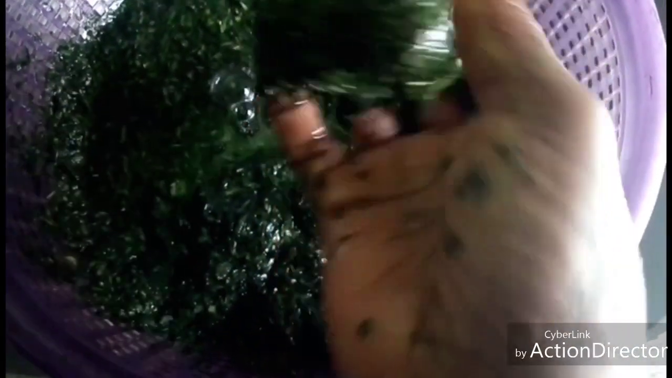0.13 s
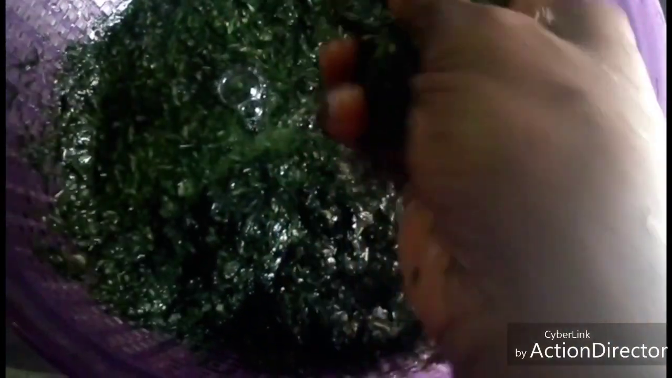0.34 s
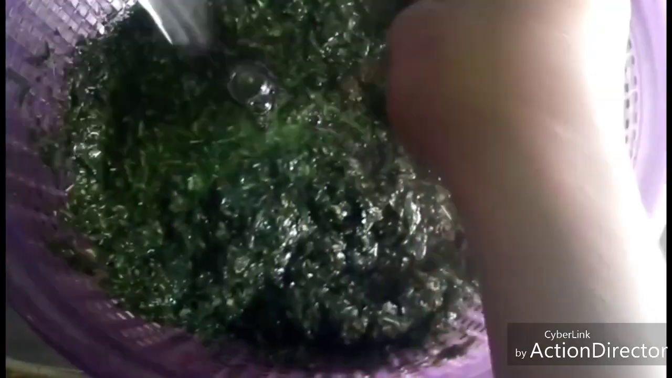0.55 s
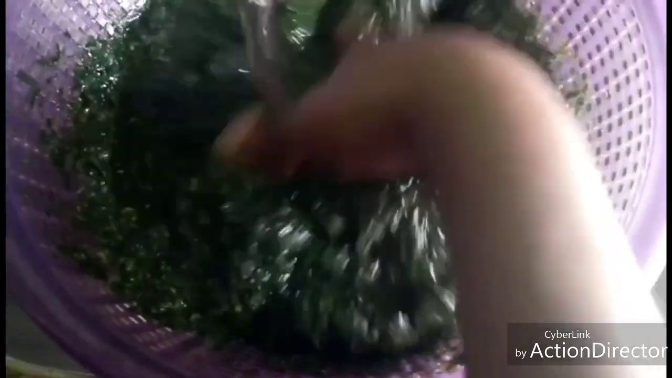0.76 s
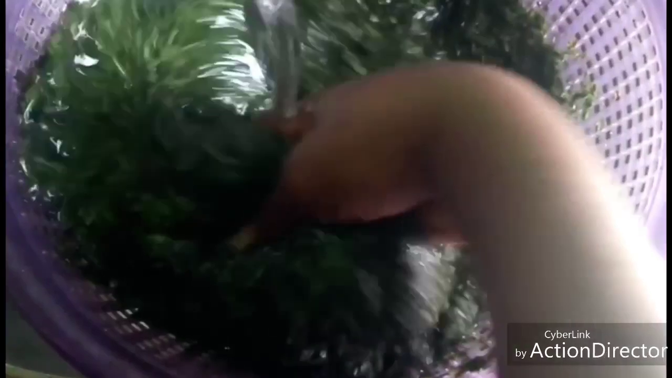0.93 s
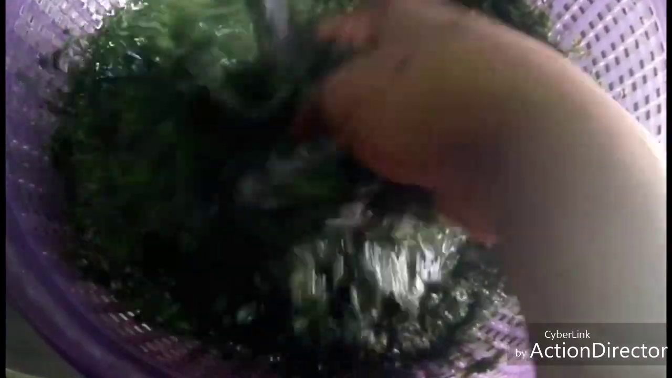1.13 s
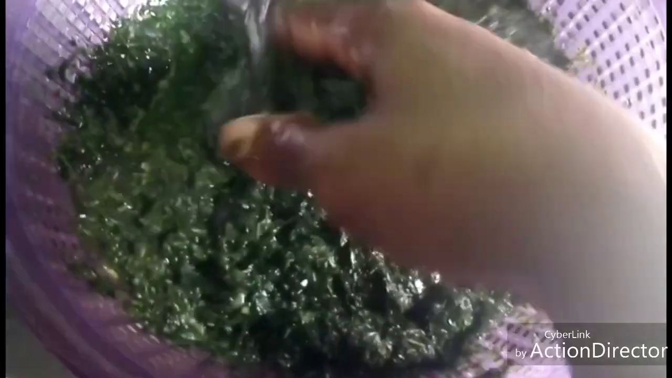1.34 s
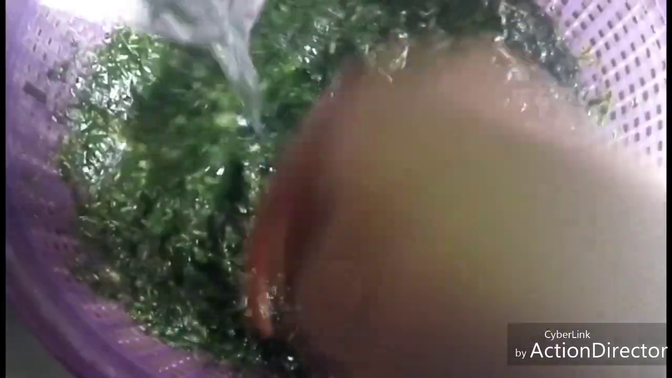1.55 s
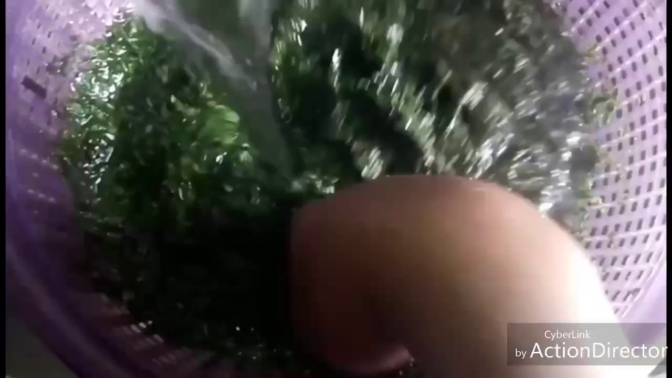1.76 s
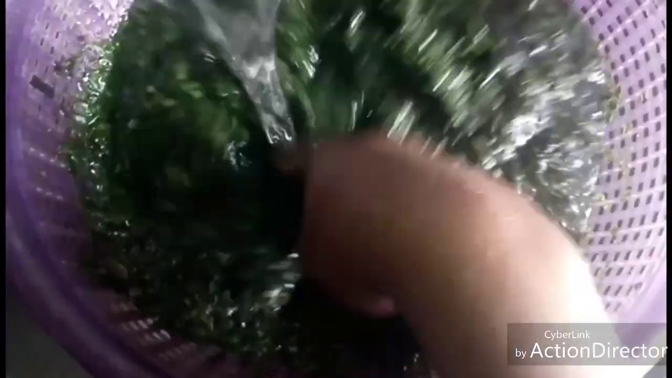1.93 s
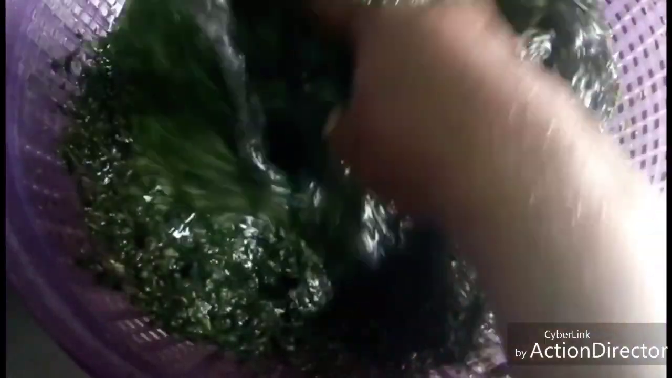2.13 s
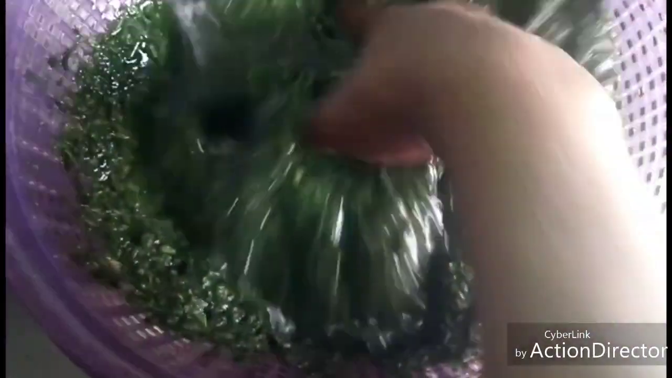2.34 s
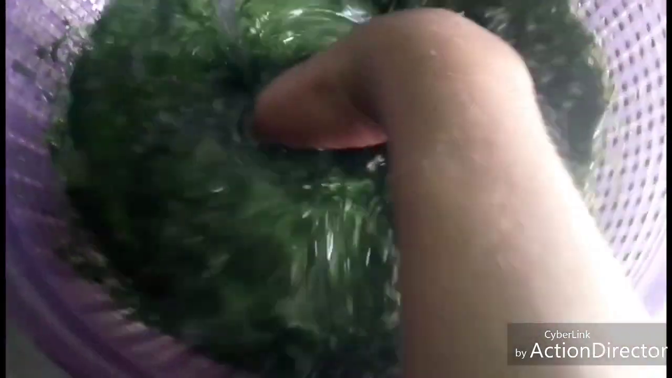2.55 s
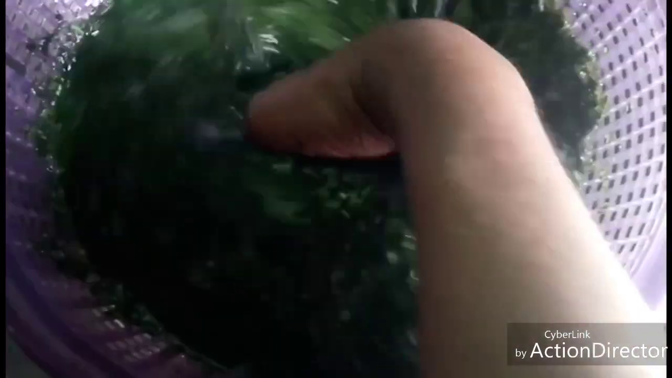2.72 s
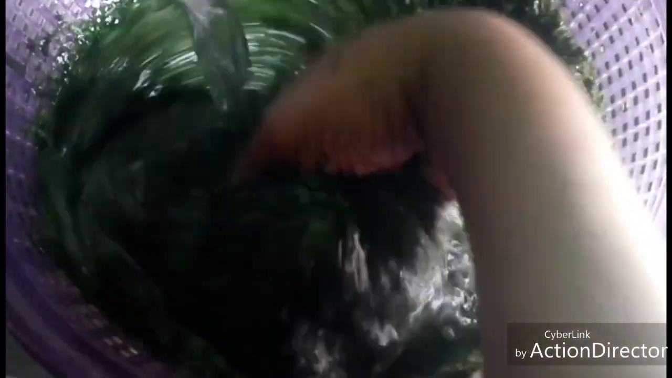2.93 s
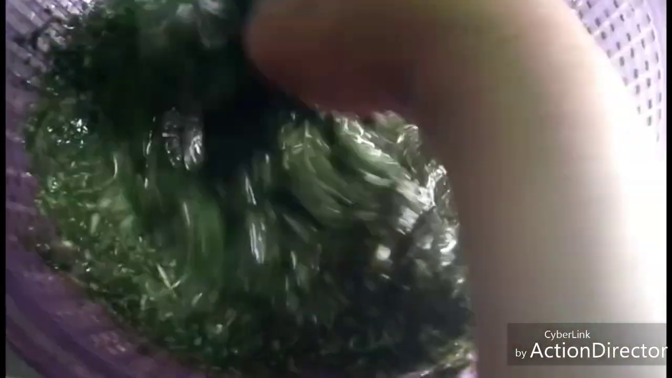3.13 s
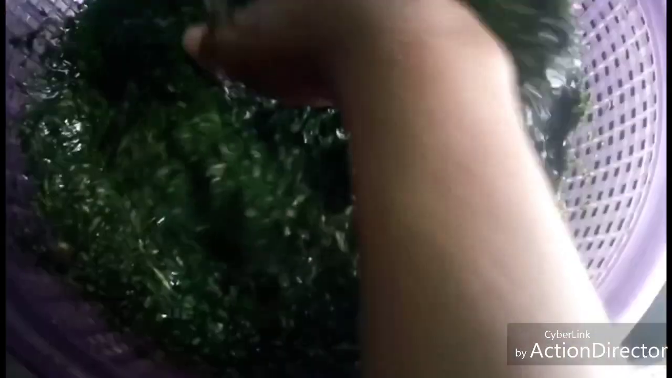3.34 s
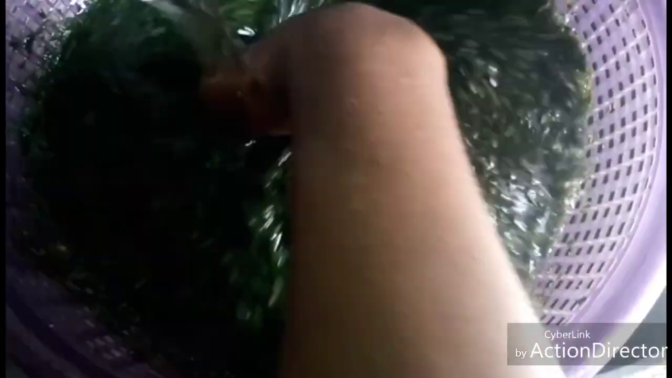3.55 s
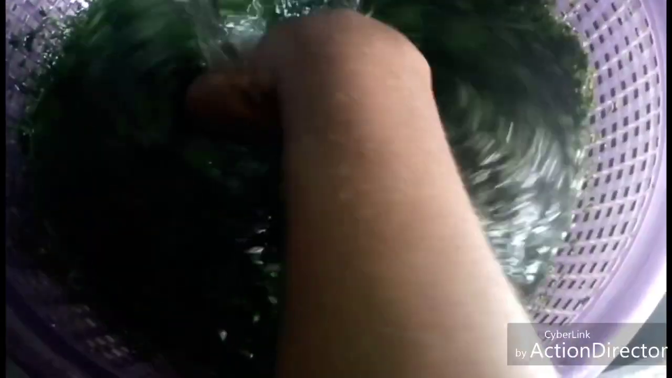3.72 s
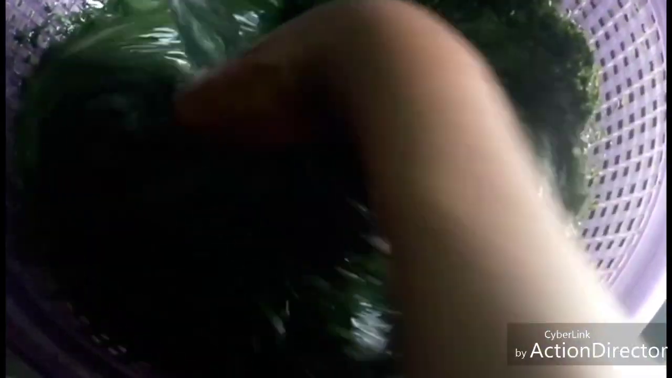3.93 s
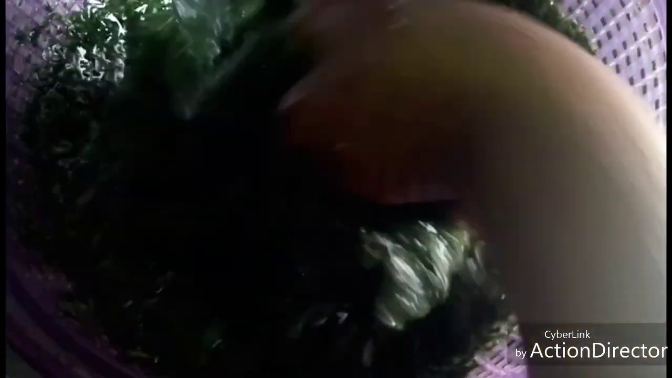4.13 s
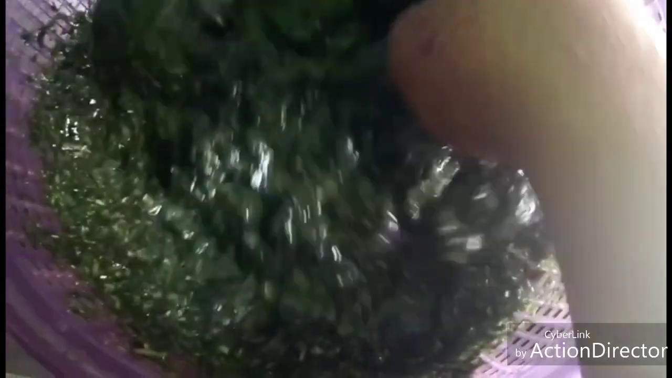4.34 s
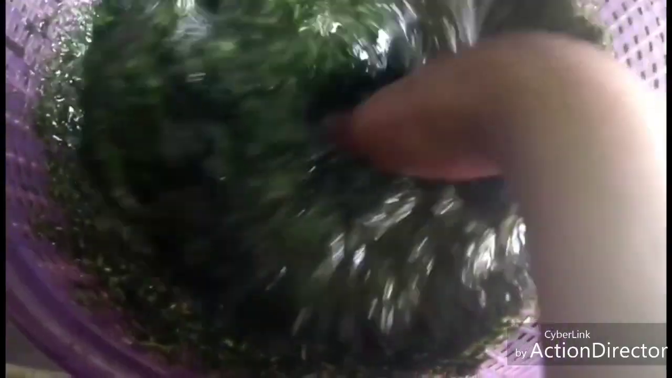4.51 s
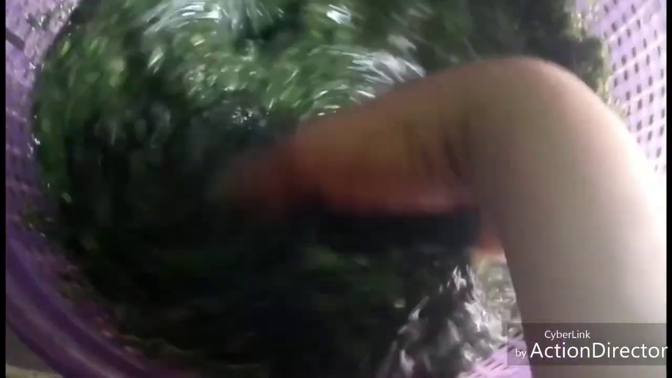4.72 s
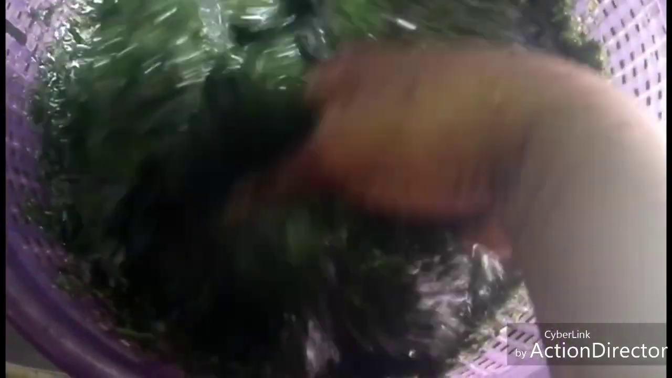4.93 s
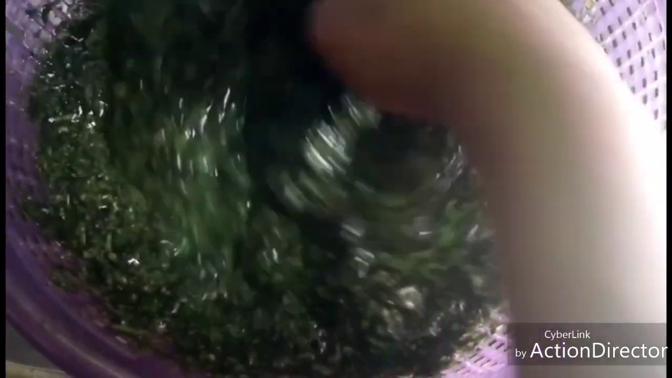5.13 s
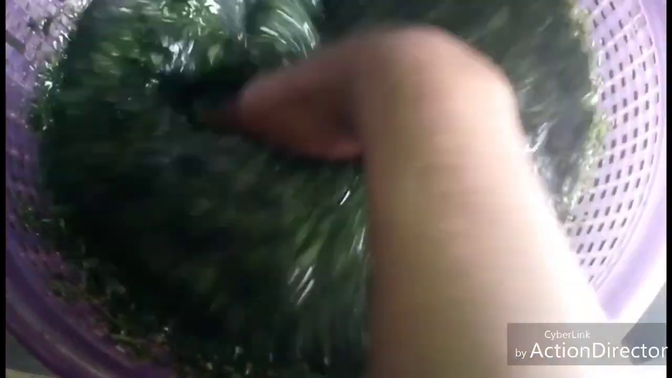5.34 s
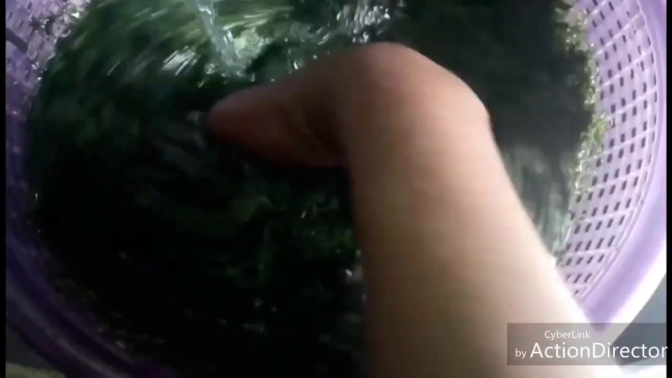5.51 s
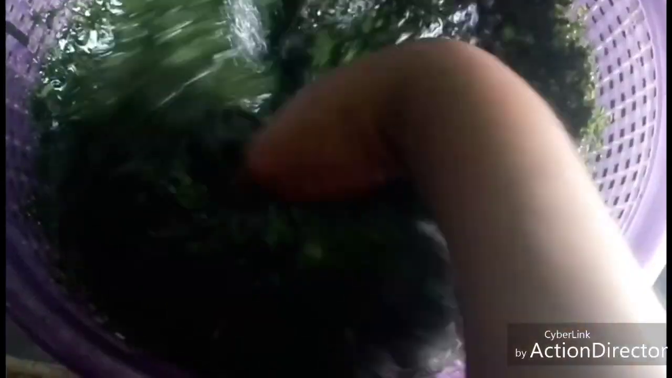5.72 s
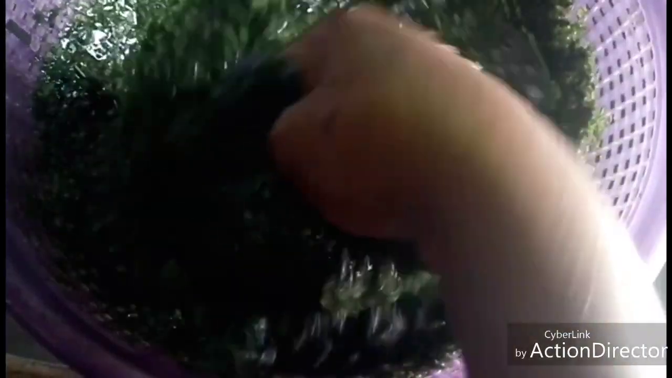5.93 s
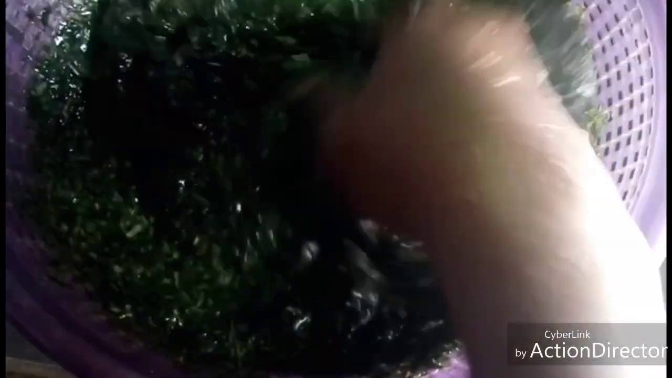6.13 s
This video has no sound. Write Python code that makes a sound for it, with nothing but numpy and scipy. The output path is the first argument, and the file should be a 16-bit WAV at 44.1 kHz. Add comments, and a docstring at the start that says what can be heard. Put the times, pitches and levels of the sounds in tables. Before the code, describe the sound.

In a small kitchen, very close to a plastic colander, low room rumble, steady faint draining hiss and a wavering low machine hum come first, with soft grainy water. At about 0.14 s a faint air pocket gulps; from 0.4 s a gentle stroke swells. Near 0.8 s the first strong stroke brings bright fizz, droplet clicks and small rising bubble pops. From 1 to 2 s strokes follow irregularly, about four or five a second, with a dull basket bump near 1.7 s. From 2 to 4.5 s it gets fuller and louder, with denser crackle, spray, slosh and gulps, strongest around 3.35 and 3.7 s; soft bumps fall near 2.5 and 3.45 s. After another bump at 4.8 s, strokes ease somewhat around 5.4 s, yet fizz, drips and bubbles continue until the end near 6.2 s. Sink reflections are short and tight.

```python
"""In a kitchen, a phone microphone close to a plastic colander: rumble, draining hiss and machine hum come first,
made of filtered noise and a wavering sine, with water poured over wet shredded leaves as grainy noise.
An air pocket gulps at once as a damped sine, then a hand stirs and squeezes: each stroke swells fizz, spray and slosh.
Before one second droplets snap as clicks with puffs of noise and small bubbles burst as rising rings.
From the second second the basket bumps now and then, as low damped sines."""
import sys
import numpy as np
from scipy import signal
from scipy.fft import rfft, irfft, next_fast_len
from scipy.io import wavfile
from scipy.ndimage import uniform_filter1d, map_coordinates

SR = 44100
rng = np.random.default_rng(int(sys.argv[2]) if len(sys.argv) > 2 else 0)


def unload_wav(signal):
    """Save mono or channel-first audio to the path in sys.argv[1] as 16-bit WAV at rate SR, clipped to [-1, 1]."""
    wavfile.write(
        sys.argv[1],
        SR,
        np.round(np.clip(np.atleast_2d(signal).T, -1, 1) * 32767).astype(np.int16),
    )


N = 272097  # length in samples
TOP_HZ = 16600  # highest bubble pitch, and the band limit of the phone


def amp(db):
    """Amplitude of a level in dB."""
    return 10 ** (np.asarray(db) / 20)


def unit(x):
    """x scaled to rms 1."""
    return x / np.sqrt(np.mean(x ** 2) + 1e-20)


def curves(rows):
    """One value per sample for each column after the time."""
    s, *columns = np.transpose(rows)
    return [np.interp(np.arange(N) / SR, s, column) for column in columns]


def wobble(rate):
    """A smooth random curve, rate knots a second."""
    knots = rng.standard_normal(int(N * rate / SR) + 4)
    return map_coordinates(knots, [np.arange(N) * rate / SR])


def gain(points, hz):
    """Gain of (Hz, dB) points read on a log frequency axis."""
    f, db = np.transpose(points)
    return amp(np.interp(np.log(hz + 1), np.log(f + 1), db))


def coloured(x, points):
    """x through the causal (minimum-phase) filter that has this spectrum."""
    m = 2 * next_fast_len(N // 2 + SR // 4)
    cepstrum = irfft(np.log(gain(points, np.fft.rfftfreq(m, 1 / SR)) + 1e-6), m)
    # folding the cepstrum onto positive time makes the filter causal
    cepstrum[1:m // 2] *= 2
    cepstrum[m // 2 + 1:] = 0
    return irfft(rfft(x, m) * np.exp(rfft(cepstrum)), m)[:N]


def rush(points, patchy_db, size=256):
    """Noise of rms 1 with patches of random gain; a larger size makes them narrower and longer."""
    z = signal.stft(rng.standard_normal(N + 2 * size), nperseg=size)[2]
    field = uniform_filter1d(rng.standard_normal(z.shape), size=5, axis=0)
    field = uniform_filter1d(field, size=5, axis=1)
    patchy = signal.istft(z * amp(patchy_db * unit(field)), nperseg=size)[1][:N]
    return unit(coloured(patchy, points))


def rings(s, level, hz, t60, rise, attack, size):
    """Damped sines; pitch climbs by twice the share rise within t60, as bubbles near the surface do."""
    s, level, hz, t60 = (np.asarray(v)[:, None] for v in (s, level, hz, t60))
    t = np.arange(size) / SR
    t60 = np.maximum(t60, 1e-3)
    envelope = level * amp(-60 * t / t60) * (1 - np.exp(-t / attack))
    wave = envelope * np.sin(2 * np.pi * hz * t * (1 + rise * t / t60))
    at = np.round(s * SR).astype(int) + np.arange(size)
    return np.bincount(at.ravel(), wave.ravel(), N + SR)[:N]


def grain_sizes(chance, spread_db):
    """Sizes of random grains: with a positive spread a few stand well out, with a negative one a few are weaker."""
    return amp(-spread_db * np.log(chance + .04))


def mix(noise, grains, share):
    """Two parts, the second weighted to this share of the power."""
    share = np.clip(share, 0, 1)
    return np.sqrt(1 - share) * noise + np.sqrt(share) * grains


# Rumble of the room around the microphone. Each row: frequency in Hz, relative level in dB.
RUMBLE = [(25, -42), (50, -15), (86, -5.5), (300, -11), (484, -20.5), (605, -20.5), (790, -20.5),
          (1020, -52), (1500, -32), (1950, -45), (3300, -120)]
# Standing waves of the room. Each row: frequency in Hz, level in dB before its random waver.
STANDING = [(129, -53.5), (157, -57), (198, -58), (466, -63), (820, -64)]


def kitchen_rumble():
    """Low noise of slowly shifting level, and room modes as sines with wavering strength and phase."""
    t = np.arange(N) / SR
    standing = np.zeros(N)
    for hz, db in STANDING:
        turn = 2 * np.pi * hz * t
        standing += amp(db) * (wobble(20) * np.sin(turn) + wobble(20) * np.cos(turn))
    level = amp(-45 + 0.91 * wobble(6))
    return level * rush(RUMBLE, patchy_db=3.0, size=2048) + standing


# Hiss of water going down the drain. Each row: frequency in Hz, relative level in dB.
DRAIN = [(1200, -39), (1700, -9.5), (3950, -1.5), (4160, 4), (4380, -2.5), (6300, -6), (7000, -41),
         (16000, -44)]


def draining():
    """Draining water as a steady hiss of filtered noise."""
    return amp(-49) * rush(DRAIN, patchy_db=1, size=512)


# Loudness of the machine behind the colander. Each row: time in seconds, middle level in dB.
HUM = [(0.0, -45), (1.49, -45.5), (1.75, -55.5), (2.42, -38), (2.58, -43.5), (3.35, -38), (4.78, -51.5),
       (4.88, -59), (5.77, -44.5), (6.17, -51)]


def machine_hum():
    """A sine near 75.2 Hz that wavers in pitch and level."""
    hum_db, = curves(HUM)
    phase = 2 * np.pi * np.cumsum(75.2 + .5 * wobble(4.97)) / SR
    return np.sqrt(2) * amp(hum_db + 2.4 * wobble(8.9)) * np.sin(phase)


def stroked(peak_db, fall, pool_db):
    """Level in dB: every stroke rises fast, holds and drains away at fall dB/s, over the steady flow."""
    rise = 474  # dB per second
    s, held = np.transpose(STROKES)[:2, :, None]
    t = np.arange(0, N, 64) / SR
    db = peak_db[:, None] - rise * np.maximum(s - t, 0) - fall * np.maximum(t - s - held, 0)
    power = np.interp(np.arange(N) / SR, t, np.sum(amp(db) ** 2, axis=0))
    return 10 * np.log10(power + amp(pool_db) ** 2)


# Poured water running through between strokes.
# Each row: time in seconds, fizz level in dB, spray level in dB, slosh level in dB, all before patter.
POOL = [(0, -54, -77, -61), (.35, -43, -100, -64.5), (.75, -42, -65, -57), (1.7, -41, -62, -53),
        (2.0, -38.5, -54.5, -48.5), (2.7, -40.5, -56.5, -48), (4.0, -36.5, -51.5, -49),
        (4.8, -37, -61, -47.5), (5.3, -40, -52, -46.5), (5.45, -42.5, -58, -53), (5.9, -35.5, -60, -48.5),
        (6.0, -41, -63, -51.5), (6.17, -41, -73, -54)]
# Pushes of the hand. Each row: start of the hold in seconds, hold in seconds, fizz level in dB before patter,
# spray level in dB above the fizz, slosh level in dB above the fizz, usual bubble pitch in Hz.
STROKES = [(.41, 0.27, -44.5, -15, -13.5, 4300), (0.803, 0.092, -32.5, -22, -12, 3460),
           (1.03, 0.049, -39.5, -6.5, -17, 5200), (1.092, 0.05, -36, -13, -18, 4200),
           (1.279, 0.082, -36, -23, -9.5, 4900), (1.437, 0.12, -30.5, -15.5, -15.5, 4770),
           (1.72, 0.02, -38.5, -27, -9, 4630), (1.811, 0.11, -35, -21, -37, 4520),
           (2.058, 0.077, -31, -14.5, -8.5, 4510), (2.2, 0.15, -33, -28, -12, 5010),
           (2.481, 0.037, -37, -12, -13.5, 4870), (2.68, 0.054, -36.5, -14.5, -10.5, 4300),
           (2.79, 0.16, -35, -17, -11, 5260), (3.02, 0.16, -32, -21, -13, 4400),
           (3.22, 0.028, -36.5, -14, -25, 4700), (3.349, 0.13, -29, -15, -16, 4800),
           (3.662, 0.35, -28.5, -19.5, -15.5, 5050), (4.08, 0.013, -32.5, -25, -25, 4340),
           (4.17, 0.042, -31, -16, -18, 4800), (4.28, 0.041, -32.5, -11, -29, 4970),
           (4.43, 0.018, -32.5, -18, -13, 4630), (4.5, 0.28, -38.5, -11, -9, 4570),
           (4.72, 0.035, -32, -26, -8, 4280), (4.87, 0.017, -40.5, -10.5, -5.5, 4330),
           (5.031, 0.098, -32.5, -13.5, -13.5, 4730), (5.24, 0.11, -33.5, -24, -11, 4790),
           (5.43, 0.013, -38, -11, -21, 4930), (5.5, 0.096, -40.5, -7, -12, 4900),
           (5.68, 0.037, -40, -24, -2.5, 4120), (5.79, 0.048, -36, -12, -13, 5340)]


def stir_levels():
    """Fizz, spray and slosh in dB and the bubble pitch in Hz, all led by the strokes."""
    s, held, fizz_db, spray_db, slosh_db, hz = np.transpose(STROKES)
    pool_fizz, pool_spray, pool_slosh = curves(POOL)
    return (stroked(fizz_db, 200, pool_fizz),
            stroked(fizz_db + spray_db, 258, pool_spray),
            stroked(fizz_db + slosh_db, 182, pool_slosh),
            np.interp(np.arange(N) / SR, s + held / 2, hz))


def swarm(count, points, mid_hz, octaves, cycles, spread_db, size):
    """Countless random bubbles of rms 1, their pitch log-normal about the curve mid_hz."""
    when, chance = rng.random((count, 2)).T
    pitch, life = rng.standard_normal((count, 2)).T
    hz = np.minimum(mid_hz[(when * N).astype(int)] * 2 ** (octaves * pitch), TOP_HZ)
    level = np.sqrt(gain(points, hz)) * grain_sizes(chance, spread_db)
    t60 = cycles * 2 ** (life / 2) / hz
    return unit(rings(when * N / SR, level, hz, t60, rise=0.13, attack=0.000095, size=size))


def ticks(count, spread_db):
    """Random droplet impacts, each one sample long."""
    when, chance, sign = rng.random((count, 3)).T
    sizes = np.sign(sign - .5) * grain_sizes(chance, spread_db)
    return np.bincount((when * N).astype(int), sizes, N)


def patter(count, t60, spread_db):
    """Loudness of splashes that start at once and die quickly, rms 1."""
    return unit(signal.lfilter([1], [1, -amp(-60 / SR / t60)], np.abs(ticks(count, spread_db))))


def mist(drops):
    """The finest droplets: high pitched specks and the treble of the impacts."""
    specks = swarm(count=2500, points=SPRAY, mid_hz=np.full(N, 9500), octaves=0.3, cycles=50,
                   spread_db=11, size=300)
    return mix(specks, unit(coloured(drops, SPRAY)), share=0.9)


def focused(x, mid_hz, octaves, lift_db):
    """Lifts the froth around its usual pitch, which moves from stroke to stroke."""
    hz, t, z = signal.stft(x, SR, nperseg=512)
    away = np.log2((hz[:, None] + 1) / np.interp(t, np.arange(N) / SR, mid_hz)) / octaves
    lift = amp(lift_db * np.exp(-away ** 2 / 2))
    return unit(signal.istft(z * lift, SR, nperseg=512)[1][:N])


# Fizz of fine bubbles close to the microphone. Each row: frequency in Hz, relative level in dB.
FIZZ = [(700, -40), (1500, -14.5), (2020, -24), (2300, -4.5), (3300, -0.5), (4720, 4), (5960, -3.5),
        (8100, -35.5), (9000, -34), (11700, -54), (19800, -120)]
# Spray thrown off the leaves. Each row: frequency in Hz, relative level in dB.
SPRAY = [(4120, -7), (7000, 5.5), (8260, -6), (13500, -7.5), (14900, 5.5), (15600, 8), (15900, -24)]
# Slosh of water in the basket. Each row: frequency in Hz, relative level in dB.
SLOSH = [(250, -13), (500, -5.5), (900, -7.5), (2200, -2.5), (3500, -41.5)]
# Blow of a droplet. Each row: frequency in Hz, relative level in dB.
CLICK = [(1000, -44), (2500, -10), (4000, -9), (5400, 3), (6600, 1), (8000, -45), (12000, -54.5)]


def stirring():
    """Water forced through the leaves: fizz, spray and slosh surge together in short splashes."""
    fizz_db, spray_db, slosh_db, bubble_hz = stir_levels()
    surge = wobble(45)
    splash = patter(count=900, t60=0.019, spread_db=-1.5)
    busy = np.clip((fizz_db + 42) / 12, 0, 1)  # gentle flow is smoother, hard strokes are grainier
    drops = ticks(count=3500, spread_db=3.5)  # the same impacts sound in fizz and spray

    froth = swarm(count=9000, points=FIZZ, mid_hz=bubble_hz, octaves=0.357, cycles=63,
                  spread_db=4.5, size=700)
    crackle = mix(froth, unit(coloured(drops, CLICK)), share=0.34)
    fizz = mix(rush(FIZZ, patchy_db=3.5, size=1024), crackle, share=0.13 + 0.46 * busy)
    fizz = focused(fizz, bubble_hz, octaves=0.15, lift_db=2.5)
    spray = mix(rush(SPRAY, patchy_db=5.5, size=128), mist(drops), share=0.21 + 0.18 * busy)
    gurgle = swarm(count=1300, points=SLOSH, mid_hz=np.full(N, 1700), octaves=0.7, cycles=31,
                   spread_db=2.5, size=1500)
    slosh = mix(rush(SLOSH, patchy_db=4.5, size=1536), gurgle, share=0.17 + 0.35 * busy)

    # each level sways, and part of it follows the splashes
    fizz_level = amp(fizz_db + 0.84 * busy * surge) * mix(0.58, splash, share=0.091 * busy)
    spray_level = amp(spray_db + 1.5 * surge + 2.9 * wobble(30))
    spray_level = spray_level * mix(0.59, splash, share=0.14 + 0.24 * busy)
    slosh_level = amp(slosh_db + 0.75 * surge + 1.54 * wobble(18))
    slosh_level = slosh_level * mix(0.77, splash, share=0.019 * busy)
    return fizz_level * fizz + spray_level * spray + slosh_level * slosh


def neighbours(s, db, hz, octaves, cycles, within_s, count):
    """Short rings close in time and pitch around each event."""
    late, pitch = rng.random((len(s), count)), rng.standard_normal((len(s), count))
    start = (s[:, None] + within_s * late).ravel()
    t60 = np.repeat(cycles / hz, count)
    hz = (hz[:, None] * 2 ** (octaves * pitch)).ravel()
    return rings(start, np.repeat(amp(db), count), hz, t60, rise=0.058, attack=0.00051, size=2000)


def splats(s, db, points, t60):
    """Short puffs of noise with this spectrum."""
    t = np.arange(900)  # samples
    puff = amp(db[:, None] - 60 * t / SR / t60) * rng.standard_normal((len(s), len(t)))
    at = np.round(s * SR).astype(int)[:, None] + t
    return coloured(np.bincount(at.ravel(), puff.ravel(), N)[:N], points)


# Air pockets closing in the leaves, close to the microphone.
# Each row: start in seconds, level in dB before onset and decay, starting pitch in Hz, 60 dB decay in seconds.
GULPS = [(.138, -35.5, 596, 0.052), (.793, -15, 796, 0.014), (0.832, -23, 1380, .02),
         (1.139, -24, 1620, 0.016), (1.285, -14, 2220, 0.019), (1.321, -22.5, 1040, 0.016),
         (1.5, -24, 1300, 0.017), (1.955, -19, 855, 0.0074), (2.041, -20, 814, 0.048),
         (2.0411, -13, 1500, 0.011), (2.062, -11, 1830, 0.012), (2.248, -15, 1060, 0.0082),
         (2.349, -19.5, 1750, 0.012), (2.421, -21.5, 840, 0.012), (2.665, -22, 1020, 0.016),
         (2.706, -21.5, 1990, 0.019), (2.811, -24, 1310, 0.011), (2.883, -28, 960, 0.021),
         (2.901, -23, 510, 0.014), (2.98, -19, 1860, 0.013), (3.014, -22, 2000, 0.02),
         (3.078, -16.5, 1970, 0.018), (3.203, -18, 2270, 0.015), (3.303, -24, 1690, 0.018),
         (3.334, -21, 1650, .025), (3.464, -19, 2410, 0.011), (3.702, -12.5, 1510, 0.0075),
         (3.981, -19.5, 1360, 0.01), (4.045, -18.5, 1320, 0.01), (4.135, -26.5, 2110, 0.013),
         (4.216, -24, 850, 0.014), (4.504, -14, 1010, 0.0085), (4.774, -18, 1860, 0.013),
         (5.071, -23, 1160, 0.022), (5.097, -20.5, 1100, 0.016), (5.122, -19.5, 1450, 0.02),
         (5.155, -17, 790, 0.019), (5.233, -26.5, 826, 0.023), (5.299, -24, 1090, 0.011),
         (5.607, -17.5, 1990, 0.03)]


def gulps():
    """A closing air pocket rings with rising pitch while the water slaps and splats."""
    s, db, hz, t60 = np.transpose(GULPS)
    pockets = rings(s, amp(db), hz, t60, rise=0.049, attack=0.0024, size=4000)
    slaps = neighbours(s, db - 6, 1.22 * hz, octaves=0.31, cycles=8.6, within_s=0.00338, count=3)
    return pockets + slaps + splats(s, db - 2.5, SLOSH, t60=0.013)


# Droplets striking close by.
# Each row: start in seconds, click peak in dB, treble puff level in dB before its filter.
SNAPS = [(0.792, -36, -53), (0.799, -30, -49), (0.813, -31, -30), (0.92, -22, -36), (1.0308, -19.5, -36),
         (1.2422, -19, -30.5), (1.2942, -22, -38), (1.3091, -9.5, -30), (1.636, -15, -40),
         (1.71, -17.5, -37), (1.813, -25, -33), (1.8588, -28, -39), (2.0993, -16.5, -26),
         (2.223, -20, -29.5), (2.27, -15.5, -48), (2.292, -10, -41), (2.481, -21, -42), (2.7062, -36, -32),
         (2.7674, -34, -31), (2.843, -21, -36), (2.8635, -11.5, -32), (3.075, -20, -24.5),
         (3.125, -16.5, -29), (3.159, -23, -27), (3.2052, -12.5, -23.5), (3.504, -35, -27),
         (3.703, -16, -27), (3.7712, -13, -28), (3.786, -16, -33), (3.839, -19, -32), (3.922, -12.5, -28),
         (4.143, -18, -46), (4.1767, -18, -29), (4.254, -17, -24), (4.2968, -15, -26), (4.373, -25, -22.5),
         (4.4333, -15.5, -27), (4.6393, -32, -26), (4.751, -39, -27), (4.838, -35, -31),
         (4.875, -20.5, -39), (5.0275, -16, -41), (5.1236, -19, -30), (5.2, -20.5, -32), (5.243, -19, -50),
         (5.3004, -18, -45), (5.324, -13, -28), (5.338, -18, -28), (5.4978, -17, -36), (5.5863, -20.5, -26),
         (5.662, -28, -33), (5.7005, -19.5, -29), (5.7613, -32, -35), (5.8019, -16, -37),
         (5.849, -13.5, -44)]


def snaps():
    """A droplet lands as one needle-sharp click and a few ms of treble spray."""
    s, db, treble_db = np.transpose(SNAPS)
    impulse = np.eye(1, N)[0]
    blow = coloured(impulse, CLICK)[:SR // 50]
    strikes = np.bincount(np.round(s * SR).astype(int), amp(db), N)
    clicks = np.convolve(strikes, blow / np.abs(blow).max())[:N]
    return clicks + splats(s, treble_db, SPRAY, t60=0.011)


# Small bubbles bursting close to the microphone.
# Each row: start in seconds, level in dB before onset and decay, starting pitch in Hz.
BUBBLES = [(0.819, -17, 3710), (0.8484, -13, 3120), (0.8637, -14, 4440), (1.097, -13.5, 3940),
           (1.217, -17.5, 4540), (1.263, -27, 3250), (1.2949, -9, 4630), (1.307, -8.5, 5360),
           (1.428, -12.5, 4180), (1.458, -20, 3640), (1.496, -19.5, 3090), (1.5015, -8, 4730),
           (1.52, -6, 4760), (1.535, -22, 2870), (1.545, -19.5, 2870), (1.583, -14.5, 5000),
           (1.821, -12.5, 4920), (1.8598, -12.5, 4550), (2.094, -5.5, 4470), (2.1323, -18, 3150),
           (2.155, -14, 4740), (2.189, -12, 4650), (2.2208, -8, 5900), (2.225, -12, 4300),
           (2.2458, -15, 3650), (2.289, -5, 5600), (2.351, -16, 4470), (2.369, -15, 4550),
           (2.408, -17.5, 3290), (2.488, -35, 2500), (2.786, -14.5, 4570), (2.8016, -4.5, 5120),
           (2.8416, -9.5, 4770), (2.8951, -6, 4600), (2.917, -11, 4600), (3.004, -11, 4260),
           (3.0749, -20, 3600), (3.1253, -17, 3660), (3.16, -15.5, 4580), (3.304, -21, 3500),
           (3.3526, -4, 4930), (3.398, -4, 4840), (3.42, -8, 5030), (3.464, -14, 5100), (3.487, -14, 4570),
           (3.6505, -17.5, 3670), (3.6649, -24, 4900), (3.703, -5.5, 5300), (3.713, -13, 4330),
           (3.786, -6.5, 5830), (3.8647, -16, 2826), (3.8853, -9.5, 4400), (3.921, -6, 4620),
           (3.933, -8.5, 5630), (4.0992, -12, 4040), (4.1769, -6.5, 4720), (4.293, -10, 4620),
           (4.4985, -11.5, 5040), (4.555, -13.5, 5230), (4.569, -12, 4440), (4.8, -2.5, 4510),
           (4.818, -14, 4360), (5.0276, -15, 4300), (5.271, -29, 3050), (5.43, -22, 5400),
           (5.445, -14, 4930), (5.553, -21, 4940), (5.5867, -18, 4860), (5.7696, -17, 4600),
           (5.817, -15, 5960), (5.8483, -10.5, 5850), (6.086, -17.5, 5120)]


def bubbles():
    """Small bubbles ring with rising pitch and burst in clusters, each with two fainter neighbours."""
    s, db, hz = np.transpose(BUBBLES)
    # a bubble dies by 60 dB in 38 cycles of its starting pitch
    small = rings(s, amp(db), hz, 38 / hz, rise=0.059, attack=0.00085, size=2000)
    twins = neighbours(s, db - 6, hz, octaves=0.081, cycles=39.6, within_s=.004, count=2)
    return small + twins


# The basket shifts. Each row: start in seconds, level in dB before onset and decay, starting pitch in Hz.
BUMPS = [(1.695, -23.5, 133), (2.522, -22, 129), (3.446, -19, 88), (4.799, -26.5, 145)]


def basket_bumps():
    """Dull knocks: low damped sines with a soft onset and sinking pitch."""
    s, db, hz = np.transpose(BUMPS)
    return rings(s, amp(db), hz, np.full(len(s), .12), rise=-0.12, attack=0.012, size=9000)


def basin(x, t60):
    """Short answer of the sink and walls; a new noise tail for every quarter second of sound."""
    out, step, t = np.zeros(N + SR), SR // 4, np.arange(SR // 8) / SR
    for i in range(0, N, step):
        tail = rng.standard_normal(len(t)) * amp(-60 * t / t60) * (t > .003)
        wet = signal.fftconvolve(x[i:i + step], tail / np.linalg.norm(tail))
        out[i:i + len(wet)] += wet
    return out[:N]


def scene():
    """The kitchen behind, the stirring in front, and single water sounds with their answer from the sink."""
    background = kitchen_rumble() + draining() + machine_hum()
    stirred = stirring()
    ringing = gulps()
    clicks = snaps()
    ringing = ringing + bubbles()
    to_basin = amp(-5.0) * ringing + amp(-6.5) * clicks
    return (background + stirred + ringing + clicks + basket_bumps() + basin(to_basin, t60=.09))[None]


def record(dry):
    """The phone dulls the last treble by 22 dB and keeps nothing above its band limit."""
    m = next_fast_len(N + SR // 4)
    hz = np.fft.rfftfreq(m, 1 / SR)
    response = amp(-22 * (hz > 15850)) * (hz < TOP_HZ)
    return irfft(rfft(dry, m) * response, m)[:, :N]


dry = scene()
out = record(dry)
unload_wav(out)
```